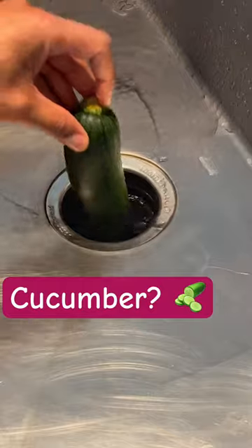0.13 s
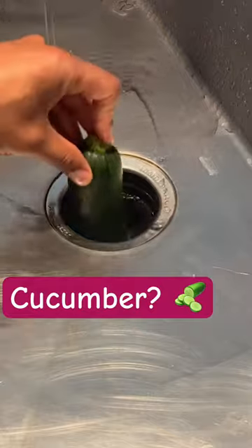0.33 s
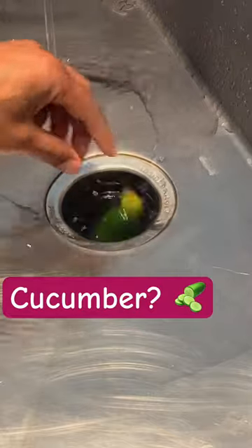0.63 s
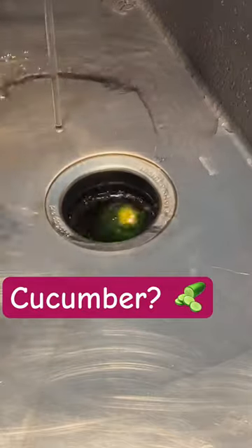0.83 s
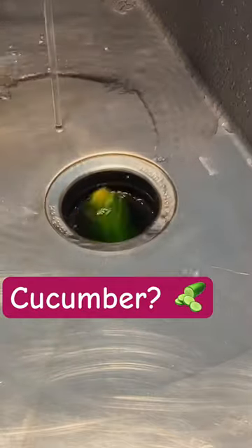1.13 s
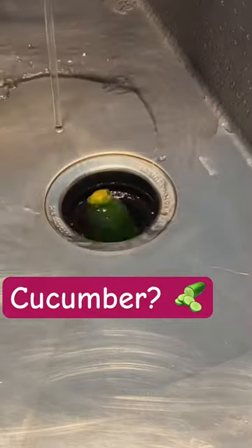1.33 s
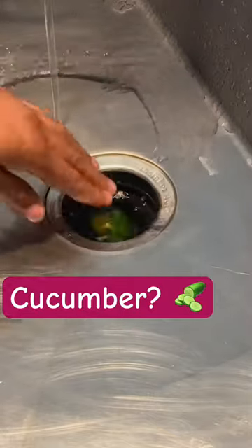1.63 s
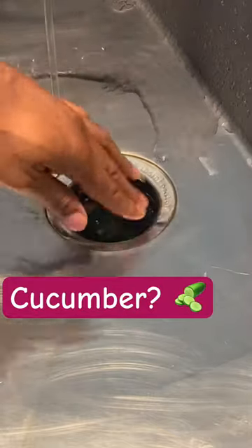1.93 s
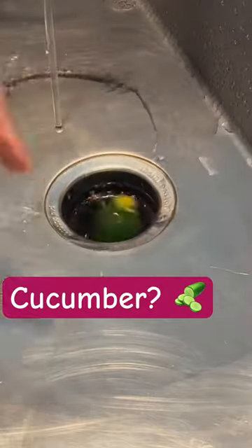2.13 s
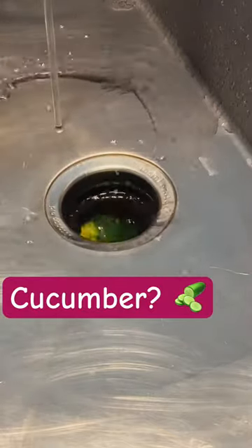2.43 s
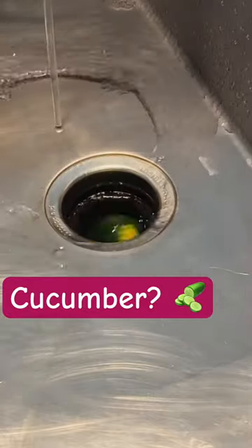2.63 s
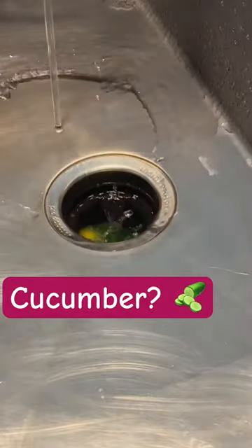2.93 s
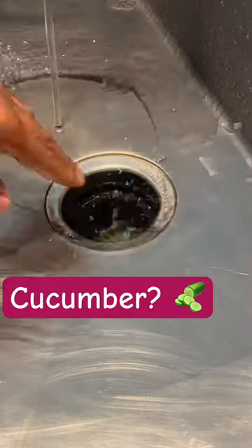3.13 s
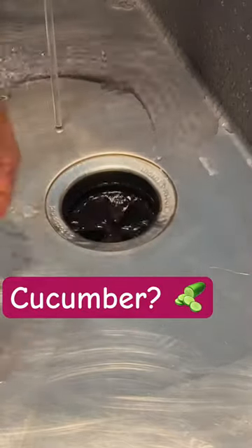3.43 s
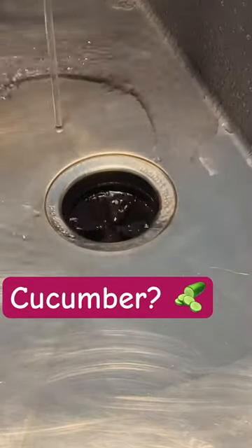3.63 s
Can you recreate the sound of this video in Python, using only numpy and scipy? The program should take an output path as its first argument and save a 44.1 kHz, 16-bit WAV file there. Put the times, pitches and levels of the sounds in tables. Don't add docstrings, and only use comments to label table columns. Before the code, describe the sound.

A sink waste grinder idles with a low hum and faint whine under tap water, then a cucumber drops in, thudding and rattling in rapid booming blows until it is shredded; close phone microphone.

```python
import sys
import numpy as np
from scipy import signal
from scipy.fft import rfft, irfft, next_fast_len
from scipy.io import wavfile
from scipy.ndimage import uniform_filter1d, map_coordinates

SR = 44100
rng = np.random.default_rng(int(sys.argv[2]) if len(sys.argv) > 2 else 0)


def rack_gain(trim_db):
    fader = np.asarray(trim_db, float)
    return 10 ** (fader / 20)


def inscribe(sig):
    pcm = np.round(np.clip(np.atleast_2d(sig).T, -1, 1) * 32767)
    wavfile.write(sys.argv[1], SR, pcm.astype(np.int16))


N = 167139

# time in seconds, level in dB.
GRIND_LOAD = [(.47, -35), (.52, -15.5), (.87, -25), (1.1, -15.5), (1.25, -28.5), (1.35, -19.5), (1.8, -24),
              (2.06, -16), (2.37, -24.5), (2.85, -24), (3.02, -12), (3.32, -16), (3.7, -24.5), (3.79, -9.5)]
# start in seconds, level in dB.
EARLY_BLOWS = [(0.514, 6.5), (0.545, 3.5), (0.593, -2.5), (0.626, -1.5), (0.674, -5.5), (0.704, -1.5),
               (0.757, -3.5), (0.78, -3), (0.815, -6), (1.02, -2.5), (1.151, -15), (1.285, -11), (1.328, 4),
               (1.364, -11), (1.393, -4), (1.449, 0), (1.475, 1), (1.5, 2), (1.682, -0.5), (1.735, -17),
               (1.761, -4), (1.853, -0.5), (1.876, -12), (1.902, -0.5), (1.94, 6), (1.97, 2)]
LATE_BLOWS = [(2.023, -3.5), (2.048, 4), (2.077, -2.5), (2.111, 1), (2.186, -5.5), (2.272, 7), (2.3, 2.5),
              (2.397, -1), (2.433, -8), (2.487, -1.5), (2.738, 1), (2.76, -4), (2.793, -6), (2.963, 5),
              (3.017, 6.5), (3.046, 5), (3.072, 6.5), (3.101, 2.5), (3.146, 5), (3.193, 3), (3.225, 3.5),
              (3.263, 4.5), (3.303, 10), (3.328, -4.5), (3.368, -8.5), (3.404, -2), (3.451, -3)]
# pitch in Hz, width in Hz, level in dB.
BASIN_MODES = [(46, 8, -48), (68.7, 6.1, -4.5), (92.9, 23, -2), (129.76, 20.3, -2.5), (176.7, 19, -8),
               (207.75, 14, -8), (301, 16, -18.5), (332.3, 11.6, -17.5)]
# pitch in Hz, width in Hz, level in dB.
BLOW_THUMP = (120, 140, -12)
# time in seconds, level in dB.
PULP_LEVEL = [(.04, -40.5), (.44, -46.5), (.5, -35), (.6, -43), (.81, -44), (1.7, -43), (1.94, -38.5),
              (2.17, -47), (2.27, -35.5), (2.36, -45.5), (2.8, -41), (3.02, -34.5), (3.3, -31.5),
              (3.45, -37.5), (3.79, -41.5)]
# pitch in Hz, width in Hz, level in dB.
PULP_MODES = [(499, 8.3, 5.5), (520, 30, -21), (673, 130, -2), (960.3, 8, 5), (1058, 102, -3),
              (1246, 38, 5.5), (1347, 153, -5), (1675, 80, -4.5), (2660, 880, -10)]
# start in seconds, peak in dB, pitch in Hz.
CRACKS = [(0.1373, -25, 2740), (0.1633, -19, 2980), (0.1986, -20, 2900), (0.2844, -21, 2810),
          (0.4792, -12.5, 2160), (0.568, -23, 2560), (0.5872, -22, 2100), (0.6036, -19.5, 3300),
          (0.8318, -25, 2550), (0.881, -21.5, 2550), (1.0564, -21, 2610), (1.2891, -19.5, 3700),
          (1.327, -26, 2640), (1.3823, -16.5, 2500), (1.4273, -21.5, 2080), (1.7271, -22.5, 2610),
          (1.8653, -18, 2130), (2.3292, -17.5, 2900), (2.3967, -21.5, 2530), (2.4397, -20.5, 2530),
          (2.8247, -19, 2530), (2.913, -20, 3080), (3.0097, -18.5, 3940), (3.0397, -12.5, 3160),
          (3.1094, -23, 2700), (3.139, -26, 3410), (3.1593, -18, 2160), (3.2232, -24, 2870),
          (3.2581, -21.5, 3530), (3.302, -27, 3280), (3.3646, -26, 2750), (3.3863, -27, 2170)]
# start in seconds, peak in dB, pitch in Hz.
WALL_KNOCKS = [(0.524, -4, 296), (0.549, -6, 205), (0.685, -19.5, 204), (1.106, -15, 188),
               (1.278, -26, 229), (1.328, -8, 202), (1.834, -16, 214), (1.934, -4, 199), (2.046, -21, 199),
               (2.086, -11, 211), (2.214, -16, 191), (2.267, -7, 203), (2.472, -16, 206), (2.68, -20, 189),
               (2.724, -4, 210), (2.881, -6.5, 224), (2.959, -17.5, 208), (3.043, -9, 213),
               (3.405, -10, 215)]
# start in seconds, peak in dB.
WET_SLAPS = [(0.477, -18.5), (1.281, -21), (1.835, -21), (2.158, -18), (2.245, -16), (2.716, -28),
             (2.902, -16), (3.008, -17), (3.04, -10.5), (3.135, -21), (3.156, -10.5), (3.226, -19),
             (3.252, -12), (3.306, -17)]
# time in seconds, level in dB.
RATTLE_LEVEL = [(.04, -41), (.2, -38), (.44, -39), (.5, -31.5), (.8, -38.5), (1.4, -35), (1.6, -40),
                (1.85, -34), (2.1, -38.5), (2.4, -35.5), (2.7, -38), (3.1, -38), (3.4, -47), (3.79, -40)]
# pitch in Hz, width in Hz, level in dB.
CHAMBER_MODES = [(2133, 37, 7.5), (2530, 48, 5), (2795, 120, 1.5), (3223, 260, 0), (3880, 290, -7),
                 (4560, 380, -7.5)]
# start in seconds, peak in dB.
SPITS = [(0.229, -18.5), (1.127, -22), (1.1958, -31), (1.3835, -20), (1.4891, -23), (1.5335, -23),
         (1.745, -20), (1.927, -20.5), (2.064, -23.5), (2.158, -20.5), (2.3272, -35), (2.8241, -17),
         (2.8964, -35), (2.9119, -23), (2.9872, -15), (3.0376, -16), (3.1663, -17.5), (3.2222, -21)]
# time in seconds, level in dB.
WHINE_LEVEL = [(.04, -35.5), (.41, -42), (.6, -42), (.9, -46), (1.6, -57), (1.9, -35), (2.1, -48),
               (2.41, -35.5), (2.5, -49.5), (3.17, -30.5), (3.5, -52.5), (3.79, -37)]
# frequency in Hz, density in dB per Hz.
IDLE_SPECTRUM = [(30, -26), (55, -12), (75, 0), (230, -4), (340, -7), (380, -17), (700, -17), (850, -32)]
# time in seconds, level in dB.
WATER_FLOW = [(.04, -36.5), (.25, -28), (.38, -30.5), (.48, -30.5), (.8, -34), (1.38, -34), (1.61, -35.5),
              (1.72, -29), (1.93, -37), (2, -36), (2.34, -31), (2.8, -35.5), (3, -31.5), (3.3, -32.5),
              (3.5, -39), (3.79, -39.5)]
# frequency in Hz, density in dB per Hz.
SPLASH_SPECTRUM = [(300, -26), (850, 3), (1900, -4), (2700, 3.5), (5000, 9.5), (7500, 3.5), (10000, 0.5),
                   (13000, 11.5)]
# frequency in Hz, density in dB per Hz.
CLEAR_SPECTRUM = [(300, -1), (1000, 2.5), (2300, 4), (3500, -32), (5000, -20), (6300, 3.5), (10000, -8.5),
                  (13000, -4)]
# frequency in Hz, phase in turns.
PORT_PHASE = [(4100, 0), (4650, .04), (5050, .25), (5400, .455), (5800, .5), (7500, .5), (9500, .58),
              (13700, .75), (15000, .752), (15500, .772)]
# frequency in Hz, level in dB.
UNSHARED_LEVEL = [(100, -56), (300, -26), (900, -11), (1300, -24), (1500, -70), (7300, -70), (8000, -7),
                  (16000, -16)]
# start in seconds, end in seconds, lower edge in Hz.
CALM_SPELLS = [(0, .57, 12300), (.95, 1.16, 14000), (1.73, 1.97, 14000), (3.08, 3.79, 14000),
               (3.63, 3.77, 12300)]
# lower edge in Hz, upper edge in Hz.
STRAY_BAND = (4500, 9000)

BLOWS_HZ = 2 * 29.48
BLOW_SLIP = 0.36
BLOW_LEAD_S = 0.00395
WHINE_HZ, WHINE_SWAY_HZ, WHINE_SWAY_DB = 1249, 3.94, 3.5
CLEAR_S, CLEAR_FADE_S = 3.33, 0.08
START_S, TOP_HZ, LIMIT = 0.0355, 15800, 0.95


def unit(x):
    return x / np.sqrt(np.mean(x ** 2) + 1e-20)


def along(points, hz):
    f, v = np.transpose(points)
    return np.interp(np.log(hz + 1), np.log(f + 1), v)


def curve(rows):
    s, v = np.transpose(rows)
    return np.interp(np.arange(N) / SR, s, v)


def wobble(rate):
    knots = rng.standard_normal(int(N * rate / SR) + 4)
    return map_coordinates(knots, [np.arange(N) * rate / SR])


def filtered(x, response):
    m = next_fast_len(N + SR // 2)
    return irfft(rfft(x, m) * response(np.fft.rfftfreq(m, 1 / SR)), m)[..., :N]


def body(modes):
    def response(f):
        total = 0
        for k, (hz, width, db) in enumerate(modes):
            damping = 1j * f * width
            total = total + (-1) ** k * rack_gain(db) * damping / (hz * hz - f * f + damping)
        return total
    return response


def rush(spectrum, patchy_db):
    z = signal.stft(rng.standard_normal(N), nperseg=512)[2]
    patches = uniform_filter1d(rng.standard_normal(z.shape), 8, 0)
    patches = unit(uniform_filter1d(patches, 8, 1))
    x = signal.istft(z * rack_gain(patchy_db * patches), nperseg=512)[1][:N]
    return unit(filtered(x, lambda f: rack_gain(along(spectrum, f))))


def load_gain():
    return rack_gain(curve(GRIND_LOAD)) * (np.arange(N) > GRIND_LOAD[0][0] * SR)


def grinding():
    load = load_gain()
    k = np.arange(int(BLOWS_HZ * N / SR) - 2)
    luck = rng.standard_normal((len(k), 3))
    at = ((k + 1 + BLOW_SLIP * luck[:, 0]) / BLOWS_HZ * SR).astype(int)
    small = np.bincount(np.clip(at, 0, N - 1), np.sign(luck[:, 1]) * rack_gain(3.5 * luck[:, 2]), N)
    s, db = np.transpose(list(EARLY_BLOWS) + list(LATE_BLOWS))
    push = rack_gain(db) * np.sign(rng.standard_normal(len(s)))
    big = np.bincount(((s - BLOW_LEAD_S) * SR).astype(int), push, N)
    scrape = load * rng.standard_normal(N)
    force = rack_gain(55.5) * small * load + rack_gain(45) * big + rack_gain(25) * scrape

    boom = np.zeros(N)
    for hz, width, db in BASIN_MODES:
        struck = force * rack_gain(2.5 * wobble(25.03))
        boom += filtered(struck, lambda f: rack_gain(db) * body([(hz, width, 0)])(f) ** 2)
    hz, width, db = BLOW_THUMP
    thump = filtered(force, lambda f: rack_gain(db) * body([(hz, width, 0)])(f) ** 2 / (1 + 1j * f / 230) ** 2)

    decay = rack_gain(-60 * np.arange(2000) / SR / 0.022)
    gate = np.convolve(abs(small) + 0.85 * abs(big), decay)[:N]
    rasp = unit(filtered(rng.standard_normal(N) * (gate + 0.5), body(PULP_MODES)))
    return boom + thump + rack_gain(curve(PULP_LEVEL) + 1) * rasp


def cracks():
    bursts, pings = np.zeros((2, N + SR))
    t = np.arange(SR // 8) / SR
    rise = 1 - np.exp(-t / 0.0006)
    for s, db, hz in CRACKS:
        start = round(s * SR)
        burst = rack_gain(-60 * t / 0.036 - 12.5) * rng.standard_normal(len(t))
        ping = rack_gain(-2 - 60 * t / 0.04) * np.sin(2 * np.pi * hz * t)
        bursts[start:][:len(t)] += rack_gain(db) * rise * burst
        pings[start:][:len(t)] += rack_gain(db) * rise * ping
    return filtered(bursts[:N], lambda f: rack_gain(along(SPLASH_SPECTRUM, f))) + pings[:N]


def knocks():
    dull, wet = np.zeros((2, N + SR))
    t = np.arange(SR // 6) / SR
    rise = 1 - np.exp(-t / 0.0034)
    for s, db, hz in WALL_KNOCKS:
        knock = rack_gain(db - 2 - 60 * t / 0.085) * rise * np.sin(2 * np.pi * hz * t)
        dull[round(s * SR):][:len(t)] += knock
    for s, db in WET_SLAPS:
        slap = rack_gain(db - 9 - 60 * t / 0.11) * rng.standard_normal(len(t))
        wet[round(s * SR):][:len(t)] += slap
    muffle = lambda f: 4 * (1j * f / 500) / (1 + 1j * f / 500) / (1 + 1j * f / 1500) ** 2
    return dull[:N] + filtered(wet[:N], muffle)


def rattle():
    struck = rng.random(N) < 700 / SR
    spread = rack_gain(5 * rng.standard_normal(N).clip(-2, 1))
    ticks = unit(struck * rng.standard_normal(N) * spread)
    ticks = ticks + 0.53 * rng.standard_normal(N)
    ring = sum(rack_gain(2 * wobble(15)) * filtered(ticks, body([mode])) for mode in CHAMBER_MODES)
    return rack_gain(curve(RATTLE_LEVEL) + 1.5 * wobble(30)) * unit(ring)


def spits():
    s, db = np.transpose(SPITS)
    small = rng.random((150, 2))
    at = (np.r_[s, small[:, 0] * N / SR] * SR).astype(int)
    hits = np.bincount(at, rack_gain(np.r_[db - 3, -40 + 8 * small[:, 1]]), N)[:N]
    shape = np.convolve(hits, rack_gain(-60 * np.arange(3000) / SR / 0.069))[:N]
    bright = lambda f: (1j * f / 3500) ** 2 / (1 + 1j * f / 3500) ** 2 / (1 + 1j * f / 12000)
    return filtered(shape * rng.standard_normal(N), bright)


def motor():
    t = np.arange(N) / SR
    shake = 0.092 + 3 * load_gain()
    hum_level = rack_gain(-16.5 + 6.1 * shake * wobble(18))
    hum = hum_level * np.sin(2 * np.pi * 120 * t + shake * wobble(14))
    turns = np.cumsum(WHINE_HZ + WHINE_SWAY_HZ * (1 + 6 * shake) * wobble(30)) / SR
    whine = rack_gain(curve(WHINE_LEVEL) + WHINE_SWAY_DB * wobble(30)) * np.sin(2 * np.pi * turns)
    return hum + whine + rack_gain(-33) * rush(IDLE_SPECTRUM, patchy_db=1.5)


def water():
    surge_db = 0.8 * wobble(16) + 1.5 * wobble(40)
    clear = np.clip((np.arange(N) / SR - CLEAR_S) / CLEAR_FADE_S, 0, 1)
    splash = np.sqrt(1 - clear) * rush(SPLASH_SPECTRUM, patchy_db=4.5)
    hiss = rack_gain(surge_db) * (splash + np.sqrt(clear) * rush(CLEAR_SPECTRUM, patchy_db=3.5))

    luck, t = rng.random((2500, 3)), np.arange(500) / SR
    hz = 2000 * np.exp(1.214 * luck[:, 1:2])
    size = rack_gain(12 * luck[:, 2:] ** 3)
    envelope = size * np.exp(-t * hz / 6) * (1 - np.exp(-t * hz / 9.6))
    drops = envelope * np.sin(2 * np.pi * hz * t * (1 + 5 * t))
    at = (luck[:, :1] * N).astype(int) + np.arange(500)
    bubbles = unit(np.bincount(at.ravel(), drops.ravel())[:N])
    return rack_gain(curve(WATER_FLOW)) * (rack_gain(3) * hiss + rack_gain(-9.5) * bubbles)


def scene():
    mono = grinding() + cracks() + knocks() + rattle() + spits() + motor() + water()
    return np.array([mono, mono])


def top_cut(x):
    return signal.sosfilt(signal.butter(12, 16500, fs=SR, output="sos"), x)


def record(dry):
    turn = lambda f: 2 * np.pi * along(PORT_PHASE, f)
    low, high = STRAY_BAND
    stray = filtered(np.roll(dry[0], 400), lambda f: rack_gain(-14) * (f > low) * (f < high))
    mid = filtered(dry[0], lambda f: np.cos(turn(f))) + stray
    t = np.arange(N) / SR
    for start, end, hz in CALM_SPELLS:
        spell = uniform_filter1d(1. * (t >= start) * (t < end), 900)
        mid = mid - spell * filtered(mid, lambda f: f > hz)
    side = filtered(dry[0], lambda f: -1j * np.sin(turn(f)))
    side = side + filtered(np.roll(dry[1], 700), lambda f: rack_gain(along(UNSHARED_LEVEL, f)))
    x = np.array([mid + side, mid - side])
    x = x / (1 + abs(x / LIMIT) ** 4) ** (1 / 4)
    x = filtered(x, lambda f: f < TOP_HZ) * (np.arange(N) > START_S * SR)
    return top_cut(x)


dry = scene()
out = record(dry)
inscribe(out)
```